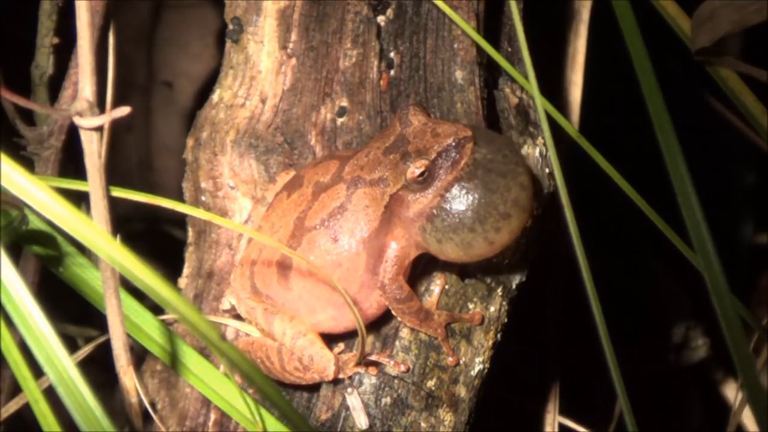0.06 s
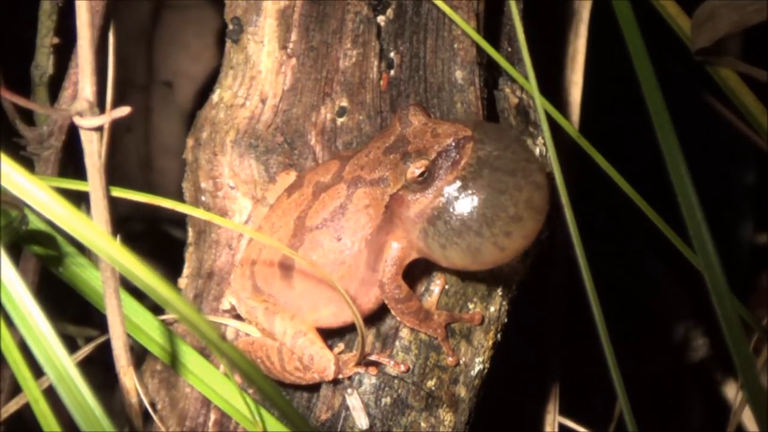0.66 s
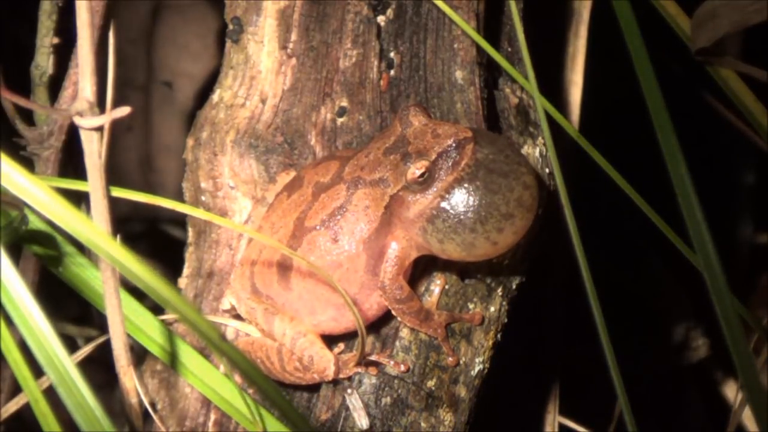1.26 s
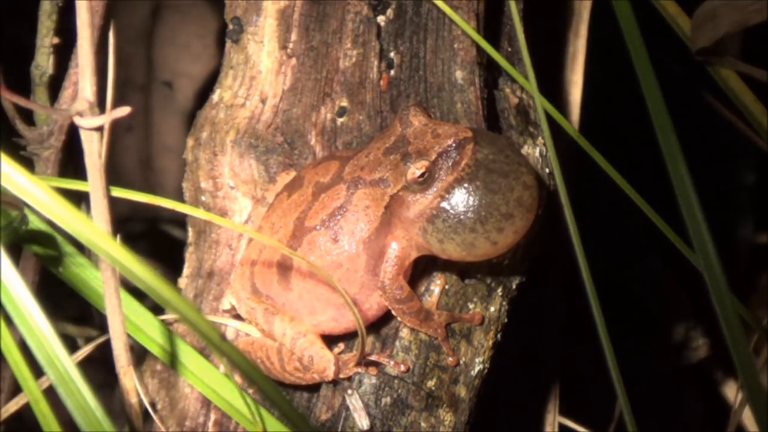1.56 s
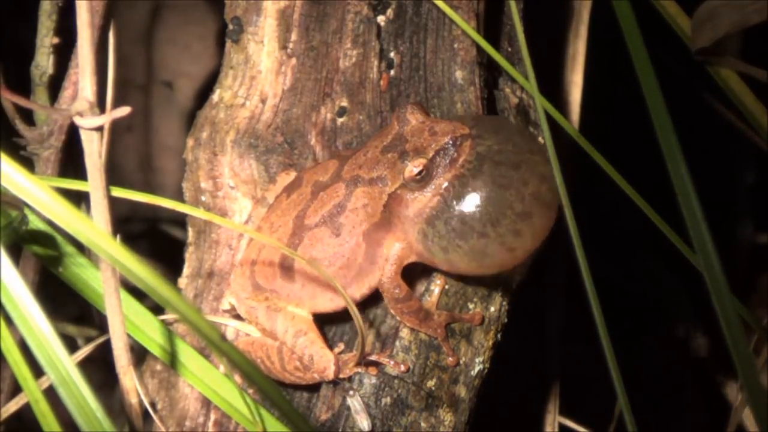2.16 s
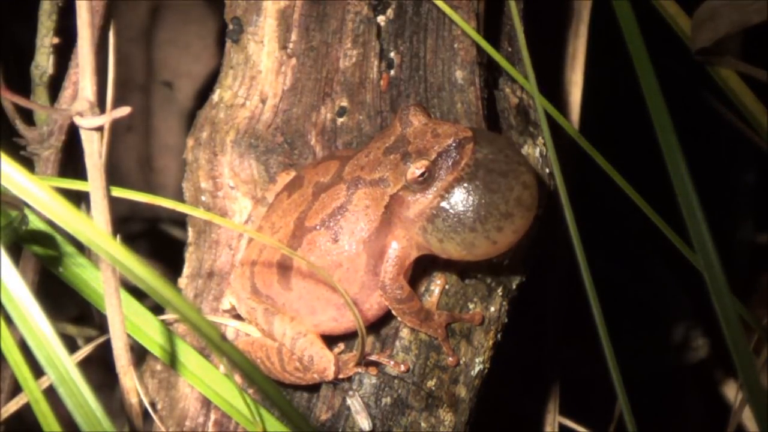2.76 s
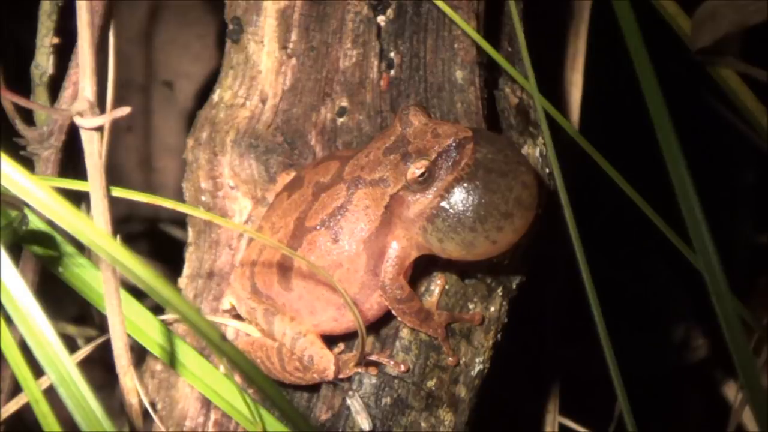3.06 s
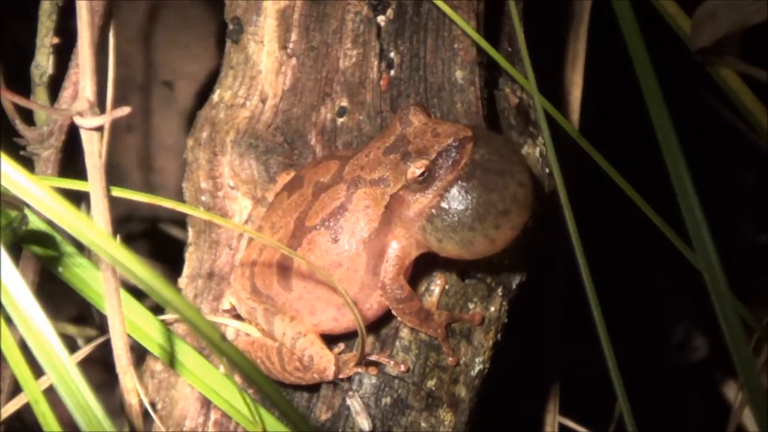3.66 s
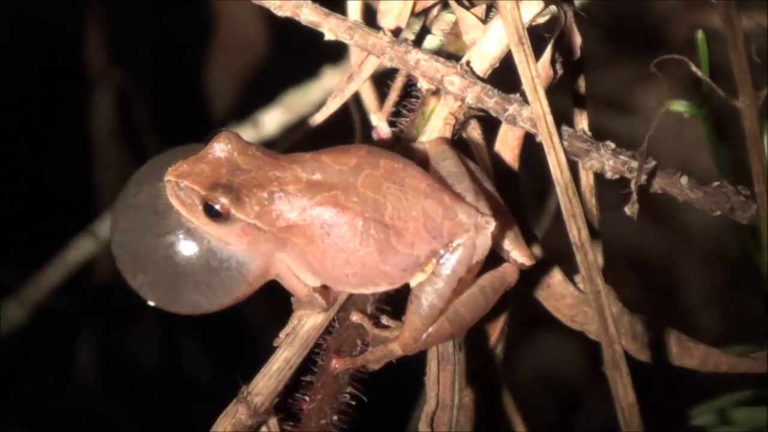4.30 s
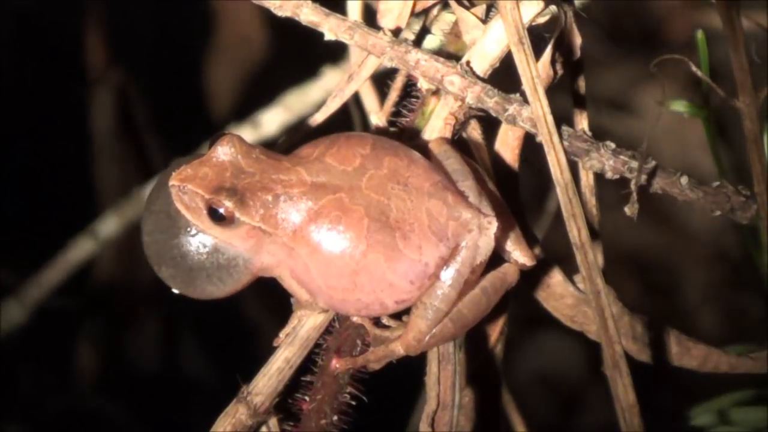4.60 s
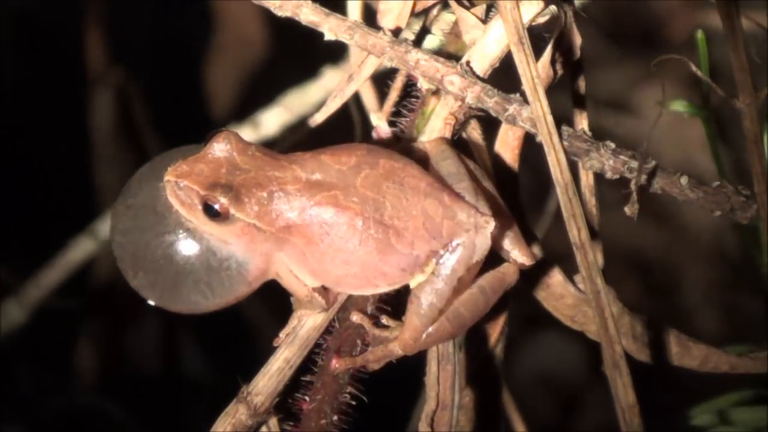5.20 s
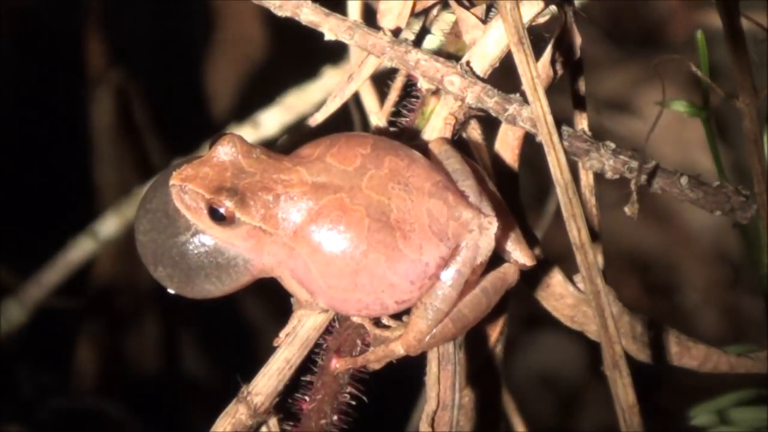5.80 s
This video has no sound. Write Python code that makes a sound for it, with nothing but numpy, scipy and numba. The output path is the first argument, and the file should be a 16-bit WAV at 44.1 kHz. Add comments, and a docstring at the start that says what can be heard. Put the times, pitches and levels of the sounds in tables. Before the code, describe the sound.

Several small frogs call at a pond at night, each peep a short, high whistle that slides upward. One very close frog peeps three times while its neighbours answer from left and right over a dense, shrill chorus. Just past halfway the sound drops out for an instant, then another close frog gives two slightly longer peeps among other callers. The background dips at each loud peep and swells back.

```python
"""Spring peepers at a night pond

Frogs call from stems, heard from two spots with a brief dropout between them. Each peep is a rising
whistle: the vocal sac rings the larynx's second harmonic and leaks faint overtones. Behind them: a dense
chorus, a hoarse frog, an insect trill, air rumble and hiss. Gain control ducks it all at close peeps."""
import sys
import numpy as np
from scipy import signal
from scipy.fft import rfft, irfft
from scipy.io import wavfile
from scipy.ndimage import uniform_filter1d, minimum_filter1d
from numba import njit

SR = 44100
rng = np.random.default_rng(int(sys.argv[2]) if len(sys.argv) > 2 else 0)


def to_wav(s):
    """Save 16-bit WAV."""
    ch = np.atleast_2d(s).T  # columns
    pcm = np.round(np.clip(ch, -1, 1) * 32767)  # PCM
    wavfile.write(sys.argv[1], SR, pcm.astype(np.int16))


N = 266805
TIME_S = np.arange(N) / SR

# foreground peeps: start_s, length_s, level_db, frog
PEEP_EVENTS = [ (.505, .118, 1.2, "trunk"), (2.132, .113, .8, "trunk"), (3.362, .116, .6, "trunk"),
               (.657, .16, -8.3, "bright"), (1.857, .165, -8.5, "bright"), (3.668, .125, -8, "bright"),
               (.835, .114, -4, "quick"), (1.648, .119, -6, "quick"), (2.428, .122, -3.5, "quick"),
               (1.50, .122, -9, "arched"), (2.115, .125, -11, "arched"), (3.178, .127, -9, "arched"),
               (.115, .15, -21, "low"), (.51, .12, -13.5, "low"), (1.70, .10, -14.8, "low"),
               (2.44, .115, -12, "low"), (3.51, .11, -11.5, "low"), (4.227, .173, 2.1, "twig"),
               (5.141, .168, 1.4, "twig"), (4.066, .151, -5.5, "reedy"), (4.95, .155, -5.5, "reedy"),
               (5.96, .153, -9, "reedy"), (3.813, .14, -7.5, "soft"), (4.68, .14, -8.5, "soft"),
               (5.576, .14, -8.5, "soft"), (4.82, .113, -4, "high"), (5.95, .117, -7.5, "high"),
               (4.425, .174, -15, "thin"), (5.128, .175, -13.5, "thin"), (4.43, .12, -11.5, "aside"),
               (5.43, .13, -12, "aside"), (1.255, .11, -27.5, "far deep"), (2.285, .105, -25, "far deep"),
               (3.815, .115, -19.5, "far low"), (4.655, .11, -20, "far low"),
               (5.395, .12, -19.5, "far low"), (.385, .105, -18, "far steady"),
               (3.98, .13, -19, "far steady"), (1.33, .1, -17.5, "far middle"),
               (2.655, .125, -18.5, "far middle"), (2.925, .12, -16, "far middle"),
               (2.955, .09, -17, "far middle"), (4.605, .12, -16, "far middle"),
               (5.59, .12, -15.5, "far middle"), (.72, .09, -11, "far high"), (1.68, .09, -18, "far high")]
# note and perch by frog: start_hz, rise_hz_per_s, left_minus_right_db, blip_db
FROG_VOICES = { "trunk": (2656, 2450, 0, -23), "bright": (2667, 2500, 8, -28),
               "quick": (2612, 3180, -2, -28), "arched": (2793, 2480, -4, -28), "low": (2463, 2010, 4, -30),
               "twig": (2490, 1230, 3, -25), "reedy": (2629, 2380, -2, -23), "soft": (2621, 1680, -6, -27),
               "high": (2832, 2700, -3, -27), "thin": (2478, 2110, 3, -32), "aside": (2634, 1810, 8, -32),
               "far deep": (2330, 2700, 3, -35), "far low": (2442, 2250, 5, -35),
               "far steady": (2592, 2000, -3, -35), "far middle": (2715, 2050, -3, -35),
               "far high": (2860, 2000, -3, -35)}
# call shape by kind: arch_hz, bend_hz, sac_hz, sac_width_hz, attack_s, release_s, right_lag_ms
CALL_SHAPES = { "trunk": (3, 0, 2810, 900, .006, .009, .01), "bright": (12, 0, 2970, 480, .012, .016, .048),
               "quick": (8, 0, 2710, 210, .014, .012, .03), "arched": (72, 0, 2990, 180, .014, .025, .062),
               "low": (19, 0, 2600, 200, .012, .015, .045), "twig": (27, 24, 2590, 260, .007, .035, .023),
               "reedy": (30, 0, 2840, 550, .02, .016, .034), "soft": (19, 0, 2720, 500, .016, .016, .046),
               "high": (36, 0, 3050, 200, .016, .018, .057), "thin": (-5, 0, 2820, 220, .006, .008, .012),
               "aside": (14, 0, 2800, 300, .015, .015, .005), "far": (25, 0, 2700, 700, .015, .025, .055)}
# larynx harmonics besides the whistle (harmonic 2): harmonic_number
LEAK_HARMONICS = np.array([1, 3, 4, 5, 6, 7, 8, 9])
# their levels by kind, re the whistle at resonance: h1_db, h3_db, h4_db, ... h9_db
LEAK_LEVELS_DB = { "trunk": (-40, -36, -45, -55, -57, -37, -40, -53),
                  "bright": (-39, -40, -39, -57, -55, -46, -34, -45),
                  "quick": (-46, -43, -54, -52, -56, -43, -53, -58),
                  "arched": (-41, -43, -48, -55, -47, -42, -60, -64),
                  "low": (-45, -45, -47, -55, -62, -53, -50, -62),
                  "twig": (-49, -31, -35, -49, -51, -45, -32, -42),
                  "reedy": (-29, -27, -33, -37, -44, -54, -38, -48),
                  "soft": (-35, -40, -44, -54, -59, -50, -44, -58),
                  "high": (-38, -36, -44, -57, -46, -36, -58, -61),
                  "thin": (-34, -22, -24, -37, -33, -34, -27, -34),
                  "aside": (-40, -31, -47, -55, -53, -48, -51, -61),
                  "far": (-37, -37, -47, -56, -56, -47, -47, -60)}
# hoarse calls: start_s, length_s, top_pitch_hz, level_db
CROAK_EVENTS = [(.32, .14, 730, -46), (1.30, .15, 730, -45), (2.63, .14, 730, -47), (2.93, .1, 750, -51)]
# croak spectrum: harmonic_number, level_db
CROAK_HARMONICS = [(3, -4), (4, 6), (5, -3), (6, -5), (7, -10), (8, -18), (9, -19), (10, -24)]
# air noise spectra: frequency_hz, relative_density_db
RUMBLE_SPECTRUM = [(20, -13), (35, -7), (90, 1), (150, -2), (230, -8), (400, -24), (2000, -60)]
RUSH_SPECTRUM = [(100, -14), (250, -1), (400, -3), (600, -5), (1100, -5), (2000, -11), (5000, -40)]
HISS_SPECTRUM = [(900, -20), (1500, 1), (1900, -2), (3500, -7), (4300, 6), (5200, -5), (6500, -17),
                 (8500, -13), (10700, -10), (12500, -20), (15500, -23)]
# swell of the rush: time_s, level_db
RUSH_ENVELOPE = [(0, -51.5), (1.4, -49), (2.2, -50.5), (3.1, -46), (3.75, -49.5), (3.85, -53.5),
                 (4.7, -54.5), (6.05, -50.5)]


def peep(length_s, start_hz, end_hz, shape, leaks_db, blip_db, scoop=.12, jitter_hz=6, throb_db=.8,
         flutter_db=2.8, swell_db=7, rasp_db=-24, rasp_s=.003, air_db=-47,
         blip_hz=1800, blip_fall=.3, blip_s=.005):
    """Rising air pressure tightens the larynx; the whistle sweeps through the sac's resonance."""
    arch_hz, bend_hz, sac_hz, sac_width_hz, attack_s, release_s, lag_ms = shape
    t = np.arange(int(length_s * SR)) / SR
    progress, remaining_s = t / length_s, length_s - t
    knots = rng.standard_normal((len(LEAK_HARMONICS) + 2, 20))
    waver, throb, *flutter = (np.interp(progress, np.linspace(0, 1, len(row)), row) for row in knots)
    glide_hz = start_hz + (end_hz - start_hz) * progress
    glide_hz += 4 * arch_hz * progress * (1 - progress) - bend_hz * np.sin(2 * np.pi * progress)
    sac_gain = 1 / np.hypot(1, 2 * (glide_hz - sac_hz) / sac_width_hz)
    snap = 1 - scoop * np.exp(-t / .0015)  # membranes snap up to pitch
    phase = phase_rad((glide_hz + jitter_hz * waver) * snap)
    lag_rad = np.array([[0], [2 * np.pi * start_hz * lag_ms / 1000]])
    voice = sac_gain * undb(throb_db * throb) * ramp(t / attack_s) * np.sin(phase - lag_rad)
    # the other harmonics bypass the sac and start sooner
    for k, leak_db, wobble in zip(LEAK_HARMONICS, leaks_db, flutter):
        level_db = leak_db + flutter_db * wobble + (k == 3) * swell_db * (progress - .5)
        partial = np.sin(k / 2 * phase - lag_rad * min(1, 2 / k))
        voice += undb(level_db) * ramp(1.5 * t / attack_s) * partial
    # rasp as the larynx opens, then a trace of air
    air_band = signal.butter(1, [1800, 3200], "bandpass", fs=SR)
    air = signal.lfilter(*air_band, rng.standard_normal(len(t)))
    voice += air * (undb(rasp_db) * np.exp(-t / rasp_s) + undb(air_db))
    pressure = np.sin(np.pi / 2 * np.clip(remaining_s / release_s, 0, 1)) * ramp(remaining_s / .004)
    # falling blip as the membranes go slack
    tension = np.clip(remaining_s / blip_s, 0, 1)
    slack_hz = blip_hz * (1 + blip_fall * (2 * tension - 1))
    blip = undb(blip_db) * np.sin(np.pi * tension) ** 2 * np.sin(phase_rad(slack_hz) - lag_rad)
    return np.sqrt(2) * (voice * pressure + blip * sac_gain[-1])


def near_frogs(scatter_db=-21):
    """Frogs within a few metres, each gliding up at its own rate; the further ones are wetter."""
    direct, scattered = np.zeros((2, 2, N))
    for start_s, length_s, level_db, frog in PEEP_EVENTS:
        start_hz, rise_hz_per_s, pan_db, blip_db = FROG_VOICES[frog]
        kind = frog.split()[0]  # far frogs share one kind
        end_hz = start_hz + rise_hz_per_s * length_s
        call = peep(length_s, start_hz, end_hz, CALL_SHAPES[kind], LEAK_LEVELS_DB[kind], blip_db)
        add(direct, start_s, undb(level_db) * pan(pan_db) * call)
        add(scattered, start_s, undb(level_db / 2 + scatter_db) * call)
    return direct + woods(scattered, t60_s=.3)


def chorus(level_db=-19, count=90, low_hz=2430, high_hz=2850, rise_hz=250,
           spread_db=2.4, pan_spread_db=3, lag_ms=.055):
    """Distant males, large and low to small and high, each peeping about once a second."""
    out = np.zeros((2, N))
    for start_hz in np.linspace(low_hz, high_hz, count):
        rise, stretch, place, lag, nearness = rng.standard_normal(5)
        shape = (*CALL_SHAPES["far"][:-1], lag_ms + .025 * lag)
        length_s = .13 * np.exp(.12 * stretch)
        end_hz = start_hz + rise_hz + 25 * rise
        call = peep(length_s, start_hz, end_hz, shape, LEAK_LEVELS_DB["far"], blip_db=-36)
        gaps_s = rng.uniform(.7, 1.1, size=10)
        starts_s = np.cumsum(gaps_s) - gaps_s[0] - rng.uniform(0, 1) - .2
        for start_s, effort in zip(starts_s, rng.standard_normal(len(starts_s))):
            gain = undb(spread_db * (nearness + effort) / 2)
            add(out, start_s, gain * pan(pan_spread_db * place) * call)
    return unit_rms(out + undb(-4) * woods(out, t60_s=.6)) * undb(level_db)


def hoarse_frog(sag=.09, roughness=.013):
    """A further frog: a low, rough call whose pitch arches up and down."""
    out = np.zeros((2, N))
    for start_s, length_s, top_hz, level_db in CROAK_EVENTS:
        progress = np.linspace(0, 1, int(length_s * SR))
        waver = np.interp(progress, np.linspace(0, 1, 60), rng.standard_normal(60))
        phase = phase_rad(top_hz * (1 - sag * (2 * progress - 1) ** 2 + roughness * waver))
        call = sum(undb(db) * np.sin(k * phase) for k, db in CROAK_HARMONICS)
        add(out, start_s, pan(0) * undb(level_db) * call * np.sin(np.pi * progress))
    return out


def insect(level_db=-50, pitch_hz=4850, fall_hz=450, stroke_s=.009, period_s=.0228, until_s=2.4):
    """Faint trill at the first spot: each wing stroke is a short falling tone; some are skipped."""
    out = np.zeros((2, N))
    progress = np.linspace(0, 1, int(stroke_s * SR))
    stroke = np.sin(np.pi * progress) ** 2 * np.sin(phase_rad(pitch_hz + fall_hz * (.5 - progress)))
    for start_s, (chance, force) in zip(np.arange(0, until_s, period_s), rng.random((200, 2))):
        if chance > .15:
            add(out, start_s + .002 * force, pan(0) * stroke * undb(level_db + 4 * (force - .5)))
    return out


def night_air(rumble_db=-48.8, hiss_db=-49.8):
    """Steady rumble and hiss, with a soft rush that slowly swells and sinks."""
    rush_db = np.interp(TIME_S, *np.transpose(RUSH_ENVELOPE))
    rumble = undb(rumble_db) * noise(RUMBLE_SPECTRUM, widen_hz=400, max_width=.6)
    rush = undb(rush_db) * noise(RUSH_SPECTRUM, widen_hz=300, max_width=.8)
    hiss = undb(hiss_db) * noise(HISS_SPECTRUM, widen_hz=1000, max_width=.45)
    return rumble + rush + hiss


def electronics_whine(level_db=-68.5, pitch_hz=15734):
    """Faint, steady line whistle of camera electronics."""
    return undb(level_db) * unit_rms(np.sin(2 * np.pi * pitch_hz * TIME_S))


def woods(x, t60_s):
    """Trunks and stems scatter sound into a short diffuse tail."""
    t = np.arange(SR // 2) / SR
    tail = rng.standard_normal((2, len(t))) * undb(-60 * t / t60_s) * ramp(t / .015)
    tail /= np.sqrt(np.sum(tail ** 2, axis=1, keepdims=True))
    return signal.fftconvolve(x.mean(axis=0)[None], tail, axes=1)[:, :N]


def noise(spectrum, widen_hz, max_width):
    """Shaped stereo noise at rms 1, centred in the bass and wider above."""
    bins_hz = np.arange(N // 2 + 1) * SR / N + 1
    knots_hz, knots_db = np.transpose(spectrum)
    gain = undb(np.interp(np.log(bins_hz), np.log(knots_hz), knots_db))
    mid, side = rfft(rng.standard_normal((2, N))) * gain
    side *= max_width * np.sqrt(bins_hz / (bins_hz + widen_hz))
    return unit_rms(irfft(np.array([mid + side, mid - side]), N))


def undb(db):
    """Decibels to gain."""
    return 10 ** (np.asarray(db) / 20)


def unit_rms(x):
    """Scale to rms 1."""
    return x / np.sqrt(np.mean(x ** 2))


def phase_rad(pitch_hz):
    """Running phase of a pitch curve."""
    return 2 * np.pi * np.cumsum(pitch_hz) / SR


def ramp(x):
    """Smooth step from 0 to 1."""
    return np.sin(np.pi / 2 * np.clip(x, 0, 1)) ** 2


def pan(left_minus_right_db):
    """Left and right gains."""
    return undb(left_minus_right_db * np.array([[.5], [-.5]]))


def add(out, start_s, sound):
    """Mix in a stereo sound, cropped to the scene."""
    offset = int(round(start_s * SR))
    first, end = max(offset, 0), min(offset + sound.shape[1], N)
    if end > first:
        out[:, first:end] += sound[:, first - offset:end - offset]


@njit
def follow(x, initial, attack_s, release_s):
    """Level follower: fast rise, exponential fall."""
    attack, release = 1 / (1 + attack_s * SR), 1 / (release_s * SR)
    out, level = np.empty(len(x)), initial
    for i in range(len(x)):
        level += (x[i] - level) * attack if x[i] > level else -level * release
        out[i] = level
    return out


def gain_control(x, threshold_db=-4.3, initial_db=.7):
    """Each close peep ducks the whole pond, which then swells back."""
    rms = np.sqrt(uniform_filter1d(np.mean(x ** 2, axis=0), size=130) + 1e-12)
    held = follow(rms, float(undb(initial_db)), attack_s=.003, release_s=1.55)
    return x / np.maximum(1, held / undb(threshold_db))


def limiter(x, ceiling_db=-1.1):
    """Flattens the peaks that slip through."""
    peak = follow(np.abs(x).max(axis=0), 0., attack_s=.0002, release_s=.05)
    gain = undb(ceiling_db) / np.maximum(peak, undb(ceiling_db))
    smooth_gain = uniform_filter1d(minimum_filter1d(gain, size=30), size=30)
    return np.clip(x * smooth_gain, -1, 1)


def scene():
    """Near frogs over the pond's background."""
    return near_frogs() + chorus() + hoarse_frog() + insect() + night_air() + electronics_whine()


def record(dry):
    """Gain control, limiter, dropout between the two spots, steep low-pass."""
    dropout_start_s, dropout_end_s, dropout_db = 3.776, 3.8095, -36
    cutoff_hz = 15900
    in_dropout = (TIME_S > dropout_start_s) & (TIME_S < dropout_end_s)
    gate = uniform_filter1d(np.where(in_dropout, undb(dropout_db), 1), size=6)
    lowpass = signal.ellip(8, .2, 70, cutoff_hz, fs=SR, output="sos")
    return signal.sosfilt(lowpass, limiter(gain_control(dry)) * gate)


dry = scene()
out = record(dry)
to_wav(out)
```